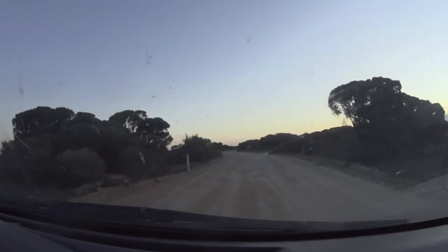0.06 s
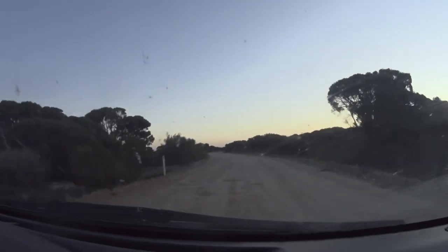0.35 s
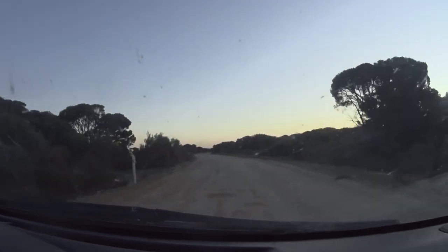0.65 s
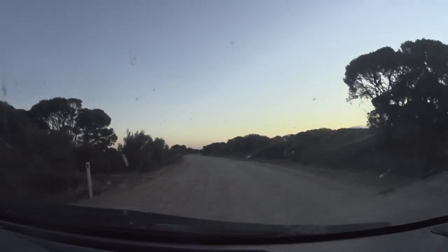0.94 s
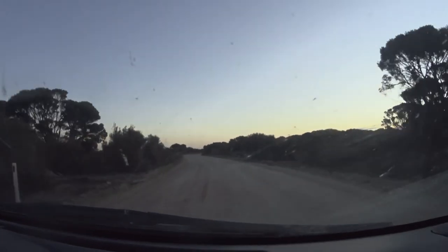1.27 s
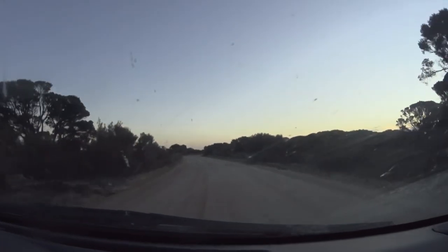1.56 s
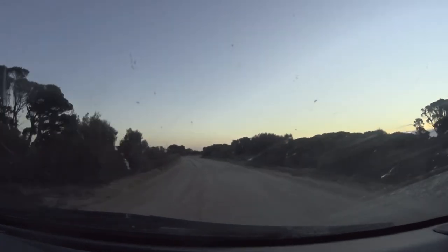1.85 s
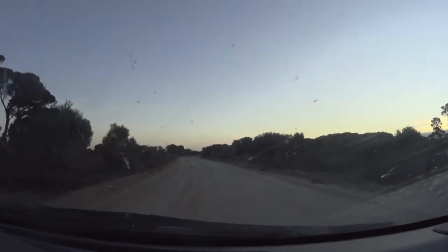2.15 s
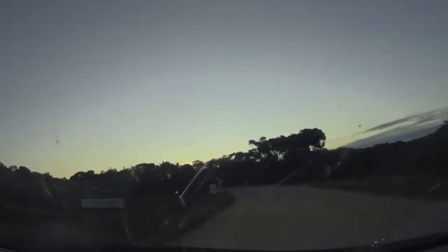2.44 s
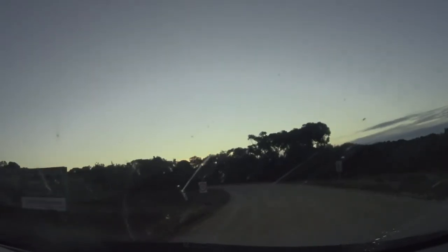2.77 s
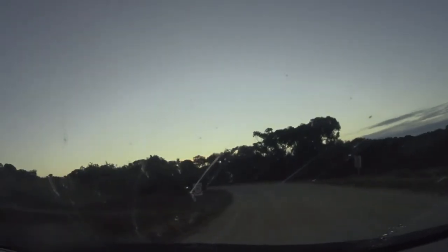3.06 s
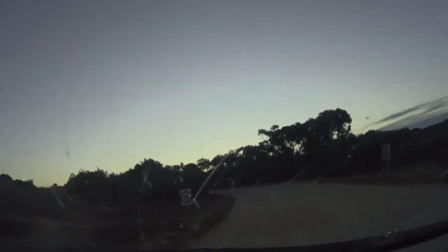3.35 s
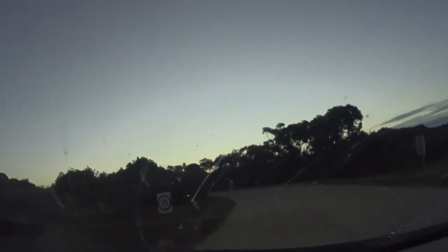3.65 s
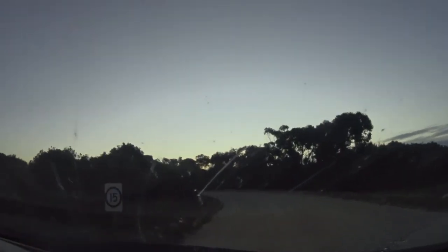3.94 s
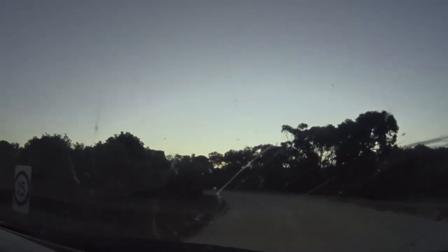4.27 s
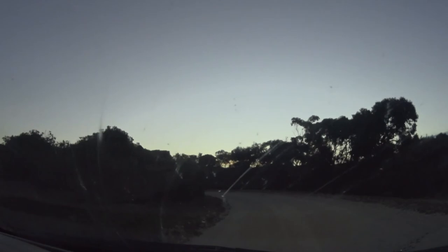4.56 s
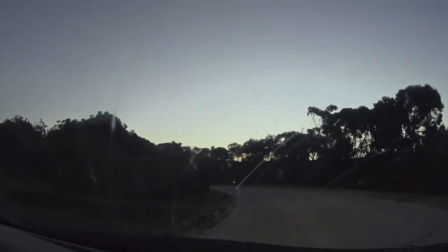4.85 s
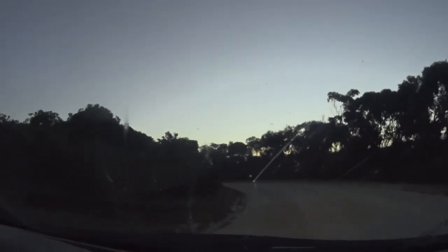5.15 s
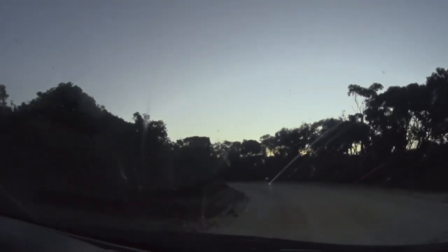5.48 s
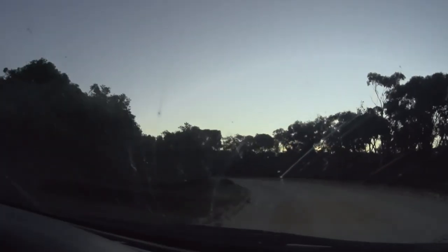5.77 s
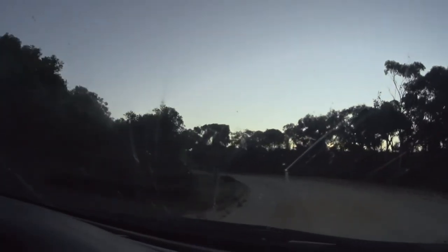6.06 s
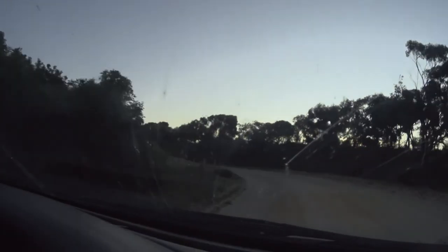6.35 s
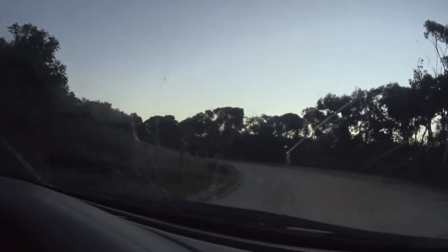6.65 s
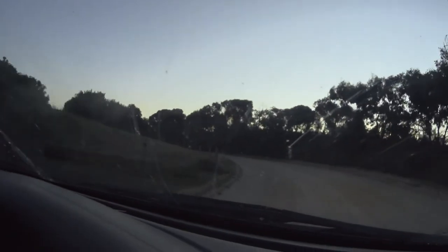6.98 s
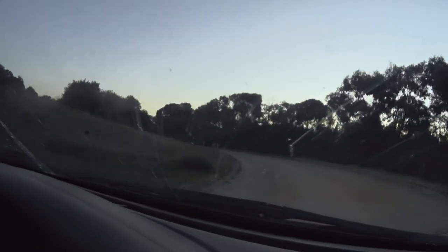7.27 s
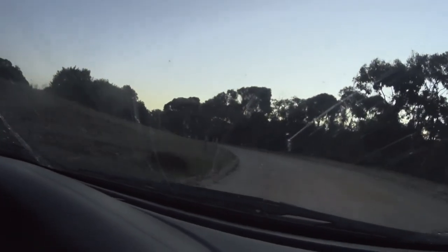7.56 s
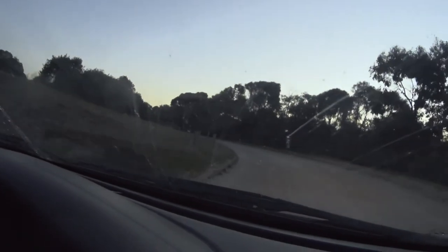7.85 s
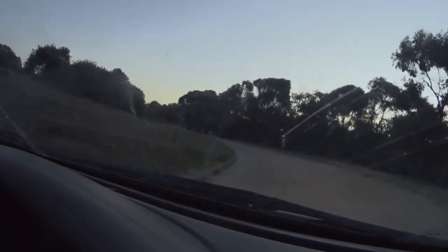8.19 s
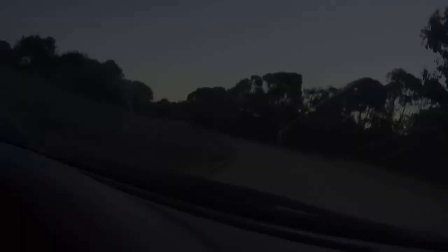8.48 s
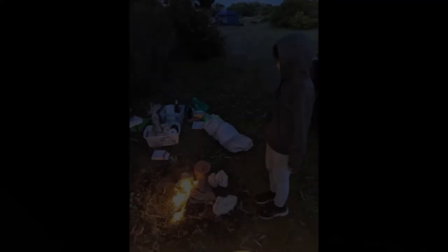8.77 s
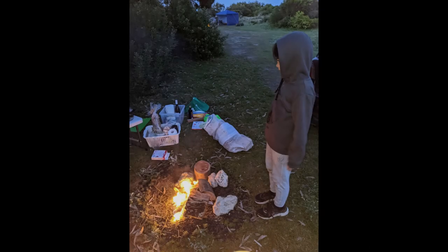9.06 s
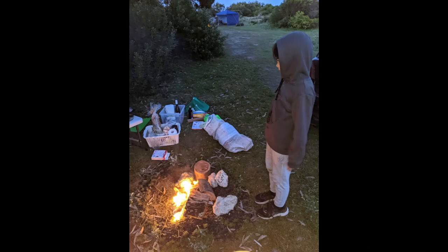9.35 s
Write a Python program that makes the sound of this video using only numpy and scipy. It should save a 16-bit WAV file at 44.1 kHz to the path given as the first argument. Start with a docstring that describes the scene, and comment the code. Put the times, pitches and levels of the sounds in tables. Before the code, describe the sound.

Inside a car, tyres drum with a low rumble and crunch over loose gravel throughout, with small pebbles popping from the tread. Near 0.9 seconds a panel clatters with a hollow ring. From 1.1 to 1.5 seconds corrugations make the loudest passage: dull suspension thumps, a swelling tyre roar, rushing stones and hard chatter from a mount beside the microphone. The ride settles, and the sound dips for an instant at 2.3 seconds. A stone knock and thump come at 3.2 seconds, followed by another hollow clatter. Between 4.3 and 4.8 seconds plastic trim ticks close by while something loose slides with a faint hiss. From 6 to 6.7 seconds a milder rough patch brings thumps, ticks and stones hitting the floor. Scattered knocks and small taps continue as the rumble eases slightly, and everything stops abruptly at about 8.7 seconds.

```python
"""Inside a car on gravel

The tyres drum through the body, exciting the cabin's resonances, and crunch over loose stones, some
of which fly up and knock on the floor panels. Corrugations thump through the suspension and shake a
camera mount into hard chatter. Plastic trim ticks, and a loose thing slides in a bend with stick-slip
friction. The sound dips for an instant early on and stops abruptly at the end."""
import sys
import numpy as np
from scipy import signal
from scipy.fft import rfft, irfft, next_fast_len
from scipy.io import wavfile
from scipy.ndimage import uniform_filter1d, map_coordinates

SR = 44100
rng = np.random.default_rng(int(sys.argv[2]) if len(sys.argv) > 2 else 0)


def dump_mix(stems):
    """Bounce the given channels to the path in sys.argv[1] as a 16-bit WAV at rate SR."""
    frames = np.atleast_2d(stems).T  # one column per channel
    limited = np.clip(frames, -1, 1)  # hard clip at full scale
    pcm = np.round(limited * 32767).astype(np.int16)
    wavfile.write(sys.argv[1], SR, pcm)


N = 419811

# Noise spectra. Each row: frequency in Hz, relative spectral density in dB.
SUSPENSION_SPECTRUM = [(15, -28), (28, -14.5), (40, -10.5), (52, 2.5), (63, -7.5), (78, -4.5), (110, -39.5),
                       (300, -61.5)]
TREAD_SPECTRUM = [(60, -28.5), (88, 8), (115, 6.5), (190, -20), (250, 6.5), (330, 3.5), (410, 8), (510, 3),
                  (620, -4.5), (1200, -54)]
CRUNCH_SPECTRUM = [(180, -29), (280, 2), (400, -1.5), (520, 4), (610, 1), (760, 4), (900, -2), (1000, -6),
                   (1150, -5), (1450, -10), (1900, -10.5), (2300, -11), (2800, -22.5), (10500, -53),
                   (12000, -78)]
GRIT_SPECTRUM = [(1200, -21), (2500, 2.5), (3300, 3), (4600, -1), (6000, -4.5), (8000, -9.5),
                 (10800, -15.5), (11600, -68)]
POP_SPECTRUM = [(400, -14), (850, 10.5), (1500, 0), (2400, 0.5), (3400, -4), (4800, -14), (7000, -13.5),
                (10500, -34.5), (11600, -70)]
HEAP_SPECTRUM = [(200, -10), (400, -0.5), (850, 4.5), (1300, -2), (1800, -4), (2300, 1.5), (2900, -9),
                 (4400, -8.5), (7000, -18.5), (10500, -23.5), (11600, -61)]
STONE_SPECTRUM = [(500, -5), (850, 6.5), (1500, 1), (1950, -4), (2270, 11), (2750, 4.5), (4500, -2.5),
                  (7000, -12.5), (10500, -26), (11600, -55)]
SNAP_SPECTRUM = [(300, 0), (1000, -1.5), (2300, 3), (4000, -3.5), (6000, -3.5), (8300, -8), (9900, -3.5),
                 (11000, -20), (12000, -22)]
SLIDE_SPECTRUM = [(2500, -27), (3450, -12), (3900, 5), (4700, 4), (5400, 4), (6200, 0), (7200, 1),
                  (8500, -13), (10400, -1), (11000, -5), (11700, -60.5)]
# Spectra that move with a pitch. Each row: multiple of the pitch, relative spectral density in dB.
PANEL_SPECTRUM = [(1 / 5, -22), (1 / 2.2, -8), (1, 0), (2, -7), (4, -20), (10, -42)]
CRACK_SPECTRUM = [(1, -15), (3.05, 0), (10, -19)]
THUD_SPECTRUM = [(1 / 5, -14), (1 / 2, 0), (1.5, 0), (3, -12), (9, -45)]
NARROW_SPECTRUM = [(.6, -50), (.9, -18), (1, 0), (1.1, -18), (1.6, -50)]
# Filtering by the cabin and by its carpet. Each row: frequency in Hz, gain in dB.
CABIN_GAIN = [(55, -33.0), (92, 1.5), (430, 0.5), (1200, -21.5)]
CARPET_GAIN = [(5000, 4), (10500, -5.5), (11800, -46.5)]
# Coherence of the cabin's sound field. Each row: frequency in Hz, left-right correlation.
COHERENCE = [(50, 0.99), (100, 1), (300, .96), (600, 0.88), (1200, 0.71), (2500, 0.75), (5000, 0.74),
             (10000, 0.68)]

# Air and panel resonances of the cabin. Each row: frequency in Hz, bandwidth in Hz, level in dB.
CABIN_MODES = [(103, 15, 0), (120, 69, -7), (174.6, 54, -4.5), (204, 43, -1.5), (239, 12, -3.5),
               (303, 11, -4.5), (340, 24, -7.5), (389, 85, -8)]
# Modes of a floor panel. Each row: multiple of the pitch, level in dB, T60 in seconds.
FLOOR_MODES = [(.74, -5, 0.06), (1, 2, 0.049), (1.19, -1.5, .03), (2.05, -19, 0.016)]
# Modes of a hollow panel, the mount and the trim. Each row: frequency in Hz, level in dB, T60 in seconds.
HOLLOW_MODES = [(832, 2, 0.13), (1056, -4, 0.18), (1210, -6.5, 0.15), (1669, -10, .14), (1850, -7.5, 0.16),
                (2180, -9, .08)]
MOUNT_MODES = [(3800, -32.5, 0.0081), (5040, -16, 0.0045), (6080, -18.5, 0.0065), (7560, -20, 0.0052),
               (10030, 4, 0.0017)]
TRIM_MODES = [(870, -14, 0.011), (2050, -5, 0.0065), (2890, -5.5, 0.0056), (4000, 3, 0.0054),
              (4520, 3.5, 0.0087), (4800, -3.5, 0.0044), (5600, -1, 0.0077), (7230, -2.5, 0.0054),
              (10600, -8, 0.0019)]

# Level of the road noise. Each row: time in seconds, gain in dB.
PACE_GAIN = [(0, 1.5), (1.2, 2), (1.85, -1.5), (2.35, 1.5), (2.8, -0.5), (4.2, -2), (5.35, -0.8),
             (8.1, -3.5)]
# Rough road. Each row: start, length and settling time in seconds, bumpiness and loose gravel in dB.
ROUGH_PATCHES = [(0.68, 0.51, 0.0081, -4.5, 2.5), (1.095, 0.44, 0.011, 0, 7.5), (1.39, 0.082, .01, 11, 3.5),
                 (1.522, 0.16, 0.072, 2, 5), (3.116, 0.72, 0.077, 2.5, 3.5), (4.992, 0.11, 0.2, 3.5, 3.5),
                 (6.167, 0.48, 0.21, 2.5, 2.5), (7.14, 0.12, .05, 2, 1), (8.492, 0.088, .05, 0.5, 3)]
# Heaps of loose stones. Each row: start and length in seconds, level in dB.
HEAPS = [(1.218, 0.042, -29.5), (1.36, 0.041, -33.5), (1.4, 0.054, -25.5), (1.473, 0.058, -32),
         (5.08, 0.032, -40.5), (6.215, 0.041, -39.5), (6.415, 0.034, -42)]
# Stones hitting the underside. Each row: start in seconds, knock level in dB, tick level in dB.
STONE_HITS = [(1.628, -28, -29), (1.802, -34, -35), (2.342, -27.5, -37), (3.166, -20, -36),
              (3.75, -30, -30), (4.388, -37, -39), (5.034, -31, -35), (5.911, -35, -32),
              (6.152, -27.5, -39), (6.2115, -23.5, -28), (6.279, -26, -32), (6.601, -25.5, -30),
              (6.977, -29, -34), (7.054, -27, -48), (7.11, -38, -35), (7.22, -29.5, -33.5),
              (7.523, -28, -32), (7.57, -33, -28.5), (7.745, -27, -28), (7.8915, -29, -36),
              (8.311, -27, -32), (8.575, -43, -40), (8.627, -31, -35)]
# Heavy blows on a panel. Each row: start in seconds, level in dB, T60 in seconds, centre in Hz,
# tilt of the ring in dB per octave.
PANEL_BLOWS = [(.916, -17, 0.19, 1140, -2.5), (1.43, -18.5, 0.11, 1403, 1), (3.344, -19, 0.12, 1700, 0)]
# Thumps through the suspension. Each row: start in seconds, level in dB, centre in Hz.
BODY_THUMPS = [(0.867, -21, 536), (1.034, -19, 307), (1.153, -11.5, 311), (1.198, -9.5, 286.7),
               (1.272, -10.5, 270), (1.408, -16.5, 330), (1.48, -11, 327), (3.167, -19.5, 380),
               (6.4, -23, 260), (6.61, -20, 240)]
# Jolts from the corrugations. Each row: start in seconds, level of the mount's clack in dB.
RIDGE_JOLTS = [(1.1068, -19.5), (1.136, -30), (1.1551, -11), (1.1589, -11.5), (1.174, -10), (1.2093, -12),
               (1.219, -20), (1.2302, -15.5), (1.2885, -7), (1.293, -18.5), (1.3116, -16.5), (1.316, -19),
               (1.3503, -7), (1.3552, -11), (1.403, -20), (1.413, -24), (1.4487, -14.5), (1.4708, -18),
               (1.4909, -9.5), (1.4944, -16.5), (1.511, -16)]
# Ticks of the trim. Each row: start in seconds, level in dB, tilt in dB per octave, factor on the
# modes' T60, snap level in dB relative to the ring.
TRIM_TICKS = [(1.056, -26, -7, .8, 0), (3.1665, -27.5, -1.5, .8, 1.5), (3.9565, -27.5, -10, 1, -7.5),
              (4.304, -31.5, 1, 1, -13), (4.443, -27.5, -8, 1, -4), (4.4988, -28, -8, 1, -9),
              (4.5955, -33, 0, 1, -1), (4.611, -23, -6, 1, -8), (4.6158, -18, -11, 1, -2),
              (4.7542, -27, 2, 1.8, -12), (4.7615, -24.5, 2, 2.2, -7), (4.7915, -30, -9, 1, -8),
              (4.828, -24.5, 1, 1.3, -4), (5.6085, -29, -8, 1.1, 1.5), (5.821, -35, -5, .6, -11),
              (6.105, -31.5, -6, .8, 3), (6.3083, -23.5, 6.5, .8, 3), (6.643, -23.5, 8, .7, 5.5),
              (6.74, -33.5, 9, .7, 7.5), (6.9259, -27, -3, .7, 3.5)]
# Taps on small parts. Each row: start in seconds, level in dB, pitch in Hz, relative snap level in dB.
SMALL_TAPS = [(6.625, -33, 4720, -4), (7.1394, -28.5, 4370, 0.5), (8.2012, -25, 4580, -2),
              (8.266, -30.5, 4760, 1)]
# Grazing contacts. Each row: start in seconds, level in dB, pitch in Hz, relative ring level in dB.
GRAZES = [(0.243, -27, 2880, -26), (0.735, -31, 2840, -2), (0.962, -22.5, 3290, -4.5),
          (2.11, -26.5, 2140, -24), (8.152, -24, 2590, -30)]

BOOM_DB, RUMBLE_DB, CRUNCH_DB, GRIT_DB, POP_DB = -47, -33, -39.5, -57, -55.5  # before pace and surface
ROAR_PEAK_S, ROAR_DB, ROAR_RISE_DB_PER_S, ROAR_FALL_DB_PER_S = 1.32, -30.5, 9, 25
SLIDE_START_S, SLIDE_DB, SLIDE_FADE_DB_PER_S = 4.45, -48, 11
FLOOR_HZ, SNAP_T60_S = 753, 0.0067
DIP_S, DIP_DB, STOP_S = (2.3205, 2.331), -22.5, 8.652
TOP_HZ, EDGE_HZ = 11130, 16000


def tyres(pace_db, bumpy_db, loose_db):
    """Forced vibration: bumps drum the body, the tread roars, and squeezed stones crunch and spit grit."""
    from_peak = np.arange(N) / SR - ROAR_PEAK_S
    roar_db = ROAR_DB + np.minimum(ROAR_RISE_DB_PER_S * from_peak, -ROAR_FALL_DB_PER_S * from_peak)
    bumps, sprays = wobble(24), wobble(24)
    stones = impacts(per_s=210, spread_db=1.0, t60=0.06)
    chips = impacts(per_s=50, spread_db=5, t60=0.021)
    boom = amp(BOOM_DB + pace_db + bumpy_db + 1.7 * bumps) * cabin(noise(), SUSPENSION_SPECTRUM)
    rumble = amp(RUMBLE_DB + pace_db + 0.59 * bumpy_db + 0.5 * bumps) * cabin(noise(), resonances)
    roar = amp(roar_db + 1.5 * bumps) * cabin(noise(), TREAD_SPECTRUM)
    crunch_db = CRUNCH_DB + 0.74 * pace_db + loose_db + bumps
    crunch = amp(crunch_db) * cabin(noise() * np.sqrt(1 + stones), CRUNCH_SPECTRUM)
    grit_db = GRIT_DB + 0.15 * pace_db + 1.6 * loose_db + 0.56 * bumps + sprays
    grit = amp(grit_db) * cabin(noise() * np.sqrt(0.4 + stones + 0.32 * chips), GRIT_SPECTRUM)
    return boom + rumble + roar + crunch + grit


def surface():
    """Excitation by the road: pace, bumpiness and loose gravel, in dB for each sample."""
    pace_db = np.interp(np.arange(N) / SR, *np.transpose(PACE_GAIN))
    patches = np.array([swell(s, length, 0.07, settle) for s, length, settle, _, _ in ROUGH_PATCHES])
    *_, bumpy_db, loose_db = np.transpose(ROUGH_PATCHES)
    return pace_db, bumpy_db @ patches, loose_db @ patches


def surges():
    """Dense impacts merge into a coarse rush as a tyre ploughs through a heap of stones."""
    level = sum(amp(db) * swell(s, length, attack=0.014, release=0.0087) for s, length, db in HEAPS)
    knocks = impacts(per_s=420, spread_db=1.5, t60=.026)
    return level * cabin(noise() * np.sqrt(knocks), HEAP_SPECTRUM)


def pops(loose_db):
    """Sparse impacts stay distinct: pebbles snap from the tread, louder on loose gravel up to a limit."""
    snaps = impacts(per_s=45, spread_db=2, t60=.024)
    level_db = POP_DB + np.minimum(loose_db, 4.5)
    return amp(level_db) * cabin(noise() * np.sqrt(snaps), POP_SPECTRUM)


def thrown_stones():
    """Impact excitation: each stone ticks and the floor knocks, at a pitch that varies with its size."""
    out = np.zeros((2, N))
    for s, knock_db, tick_db in STONE_HITS:
        detune = np.exp(.05 * rng.standard_normal())
        add(out, s, amp(tick_db) * click(tuned(STONE_SPECTRUM, detune), t60=0.035))
        add(out, s, amp(knock_db) * floor_knock(FLOOR_HZ * detune))
    return out


def floor_knock(hz):
    """Free vibration of a struck floor panel: a short hollow note over a dry thud."""
    t = np.arange(SR // 6) / SR
    ratio, db, t60 = np.transpose(FLOOR_MODES)[:, :, None]
    mode_db = db + 2 * rng.standard_normal((2, *db.shape))
    cycles = hz * ratio * t + rng.random(db.shape) / 2
    tones = np.sum(amp(mode_db - 60 * t / t60) * np.sin(2 * np.pi * cycles), axis=1)
    thud = amp(-8 - 60 * t / t60.mean()) * cabin(noise(len(t)), tuned(THUD_SPECTRUM, hz))
    return unit_peak((tones + thud) * (1 - np.exp(-t / 0.00065)))


def clatters():
    """A heavy blow excites many modes at once: a whole panel clatters and rings its hollow notes."""
    out = np.zeros((2, N))
    for s, db, t60, hz, tilt_db in PANEL_BLOWS:
        add(out, s, amp(db) * panel_hit(hz, t60, crack_share=0.48, build_up=0.15))
        add(out, s, amp(db - 3) * ring(HOLLOW_MODES, tilt_db, attack=.004, scatter_db=1, crack_db=-10))
    return out


def thumps():
    """Structure-borne sound: the hardest ridges pass through the suspension as dull thumps."""
    out = np.zeros((2, N))
    for s, db, hz in BODY_THUMPS:
        add(out, s, amp(db) * panel_hit(hz, t60=0.045, crack_share=0.35, build_up=0.21))
    return out


def rattles():
    """Shock excitation: the body panels answer each ridge with a short dry clatter."""
    out = np.zeros((2, N))
    for s, db in RIDGE_JOLTS:
        add(out, s, amp(db - 10.5) * panel_hit(hz=1550, t60=0.11, crack_share=0.42, build_up=0.42))
    return out


def mount():
    """Contact chatter: the camera mount's modes ring in a hard clack each time it meets its seat."""
    out = np.zeros((2, N))
    for s, db in RIDGE_JOLTS:
        detune = np.exp(.025 * rng.standard_normal())
        modes = np.array(MOUNT_MODES) * [detune, 1, 1]
        add(out, s, amp(db) * ring(modes, tilt_db=0.5, attack=0.00038, scatter_db=1, crack_db=-17.5))
    return out


def trim():
    """Impact and rebound: plastic parts snap together, ring and bounce once, more dully."""
    out = np.zeros((2, N))
    for s, db, tilt_db, t60_factor, snap_db in TRIM_TICKS:
        detune = np.exp(.05 * rng.standard_normal())
        modes = np.array(TRIM_MODES) * [detune, 1, t60_factor]
        add(out, s, amp(db + snap_db) * click(SNAP_SPECTRUM, SNAP_T60_S))
        add(out, s, amp(db) * ring(modes, tilt_db, attack=.0005, scatter_db=2, crack_db=-3))
        bounce_s = s + rng.uniform(.001, .002)
        bounce = ring(modes, tilt_db - 2, attack=.0006, scatter_db=2, crack_db=-5)
        add(out, bounce_s, amp(db - 6) * bounce)
    return out


def pings(attack=0.00076, t60=0.0057):
    """A single damped mode: a small hard part, when tapped, gives a snap and a very short, clean note."""
    out = np.zeros((2, N))
    t = np.arange(SR // 20) / SR
    for s, db, hz, snap_db in SMALL_TAPS:
        note = np.sin(2 * np.pi * hz * t) * amp(-60 * t / t60) * (1 - np.exp(-(t / attack) ** 2))
        add(out, s, amp(db) * note / note.max())
        add(out, s, amp(db + snap_db) * click(SNAP_SPECTRUM, SNAP_T60_S))
    return out


def scrapes():
    """Friction noise: something light grazes a panel with a short rasp that sometimes rings."""
    out = np.zeros((2, N))
    for s, db, hz, ring_db in GRAZES:
        add(out, s, amp(db) * panel_hit(hz, t60=0.12, crack_share=0.9, build_up=0.29))
        add(out, s, amp(db + ring_db) * click(tuned(NARROW_SPECTRUM, hz), t60=0.084))
    return out


def slide():
    """Stick-slip friction: a loose thing hisses over the dashboard, fading as it slows."""
    slowing_db = SLIDE_FADE_DB_PER_S * np.maximum(np.arange(N) / SR - SLIDE_START_S, 0)
    envelope = swell(SLIDE_START_S, length=0.34, attack=0.12, release=0.01)
    level = amp(SLIDE_DB - slowing_db + 1.2 * wobble(25.18)) * envelope
    slips = impacts(per_s=500, spread_db=1.5, t60=.016)
    return level * cabin(noise() * np.sqrt(0.46 + slips), SLIDE_SPECTRUM)


def panel_hit(hz, t60, crack_share, build_up):
    """Modal overlap: dense panel modes decay as noise, the treble first, dulled by the carpet."""
    t = np.arange(SR // 4) / SR

    def burst(spectrum):
        points = tuned(spectrum, hz)
        return cabin(noise(len(t)), lambda f: amp(along(points, f) + along(CARPET_GAIN, f)))

    body = burst(PANEL_SPECTRUM) * amp(-60 * t / t60)
    crack = burst(CRACK_SPECTRUM) * amp(-120 * t / t60)
    rise = 1 - np.exp(-t / (build_up * t60 ** 2))  # short hits start sharply, long ones build up
    return amp(-6.5) * (body + crack_share * crack) * rise


def ring(modes, tilt_db, attack, scatter_db, crack_db):
    """Modal superposition: a crack and damped sinusoids, whose strengths differ left and right."""
    t = np.arange(SR // 8) / SR
    hz, db, t60 = np.transpose(modes)[:, :, None]
    scatter = rng.standard_normal(hz.shape) + rng.standard_normal((2, *hz.shape))
    mode_db = db + tilt_db * np.log2(hz / hz.mean()) + scatter_db * scatter
    pitch = hz * (1 + .012 * rng.standard_normal(hz.shape))
    cycles = pitch * t + rng.random(hz.shape)
    tones = np.sum(amp(mode_db - 60 * t / t60) * np.sin(2 * np.pi * cycles), axis=1)
    crack = amp(crack_db - 60 * t / .009) * noise(len(t))
    return unit_peak((tones + crack) * (1 - np.exp(-(t / attack) ** 2)))


def click(spectrum, t60):
    """A contact transient: coloured noise that starts at once and decays exponentially."""
    t = np.arange(SR // 10) / SR
    return unit_peak(cabin(noise(len(t)), spectrum) * amp(-60 * t / t60) * (1 - np.exp(-t / .0003)))


def impacts(per_s, spread_db, t60):
    """Shot noise: the power envelope, mean 1, of random small impacts that each die fast."""
    hits = rng.random(N) < per_s / SR
    energy = hits * amp(spread_db * np.minimum(rng.exponential(size=N), 4)) ** 2
    power = signal.lfilter([1], [1, -amp(-60 / (t60 * SR)) ** 2], energy)
    return power / power.mean()


def resonances(hz):
    """Resonance: the cabin's overlapping modes add in power; the gain falls steeply below the lowest."""
    power = sum(np.abs(amp(db) * hz * width / (centre ** 2 - hz ** 2 + 1j * hz * width)) ** 2
                for centre, width, db in CABIN_MODES)
    return np.sqrt(power) * amp(along(CABIN_GAIN, hz))


def cabin(pair, colour):
    """Partial coherence: two independent noises become a stereo field of rms 1, near mono in the bass."""
    def response(hz):
        gain = colour(hz) if callable(colour) else amp(along(colour, hz))
        angle = np.arccos(np.clip(along(COHERENCE, hz), -1, 1)) / 2
        return gain * [np.cos(angle), np.sin(angle)]

    mid, side = filtered(pair, response)
    field = np.array([mid + side, mid - side])
    return field / np.sqrt(np.mean(field ** 2) + 1e-20)


def reflections(x, t60, wet_db):
    """Reverberation: glass and dashboard add a short diffuse tail."""
    t = np.arange(SR // 8) / SR
    tail = noise(len(t)) * amp(-60 * t / t60) * (1 - np.exp(-t / .002))
    return x + amp(wet_db) * signal.fftconvolve(x, tail / np.linalg.norm(tail[0]), axes=1)[:, :N]


def swell(start, length, attack, release):
    """Envelope from 0 to 1: a linear rise, a hold and an exponential release."""
    t = np.arange(N) / SR - start
    return np.clip(t / attack, 0, 1) * np.exp(-np.maximum(t - length, 0) / release)


def wobble(per_s):
    """Slow modulation: a smooth curve through per_s random values a second."""
    return map_coordinates(rng.standard_normal(int(N * per_s / SR) + 4), [np.arange(N) * per_s / SR])


def noise(n=N):
    """Two independent white noises."""
    return rng.standard_normal((2, n))


def filtered(x, response):
    """Linear filtering: the spectrum of x times a function of frequency."""
    n = x.shape[-1]
    padded = next_fast_len(n + 8192)
    return irfft(rfft(x, padded) * response(np.fft.rfftfreq(padded, 1 / SR)), padded)[..., :n]


def tuned(spectrum, factor):
    """Transposition: every frequency times one factor."""
    return np.array(spectrum) * [factor, 1]


def along(points, hz):
    """Interpolation of (Hz, value) points on a logarithmic frequency axis."""
    frequencies, values = np.transpose(points)
    return np.interp(np.log(hz + 1), np.log(frequencies + 1), values)


def amp(db):
    """Decibels to amplitude ratio."""
    return 10 ** (np.asarray(db) / 20)


def unit_peak(sound):
    """Normalisation: the mean of the two channels peaks at 1."""
    return sound / np.abs(sound.mean(0)).max()


def add(track, s, sound):
    """Superposition of a sound on the track at s seconds."""
    start = round(s * SR)
    track[..., start:start + sound.shape[-1]] += sound


def scene():
    """The sources superpose: road noise a little to the left, small rattles and pings close by."""
    pace_db, bumpy_db, loose_db = surface()
    gravel = thrown_stones() + clatters() + surges() + pops(loose_db)
    road = (tyres(pace_db, bumpy_db, loose_db) + gravel + thumps() + rattles()) * amp([[.25], [-.25]])
    return road + scrapes() + slide() + reflections(trim() + pings() + mount(), t60=0.046, wet_db=-7.5)


def record(dry):
    """Gating and band limiting: a brief dip, later a dead stop; only a trace of extreme treble passes."""
    t = np.arange(N) / SR
    dip = np.where((t > DIP_S[0]) & (t < DIP_S[1]), amp(DIP_DB), 1)
    gate = uniform_filter1d(dip * (t < STOP_S), size=64)
    low_pass = lambda hz: (1 / np.sqrt(1 + (hz / TOP_HZ) ** 160) + amp(-31)) * (hz < EDGE_HZ)
    return filtered(dry * gate, low_pass)


dry = scene()
out = record(dry)
dump_mix(out)
```